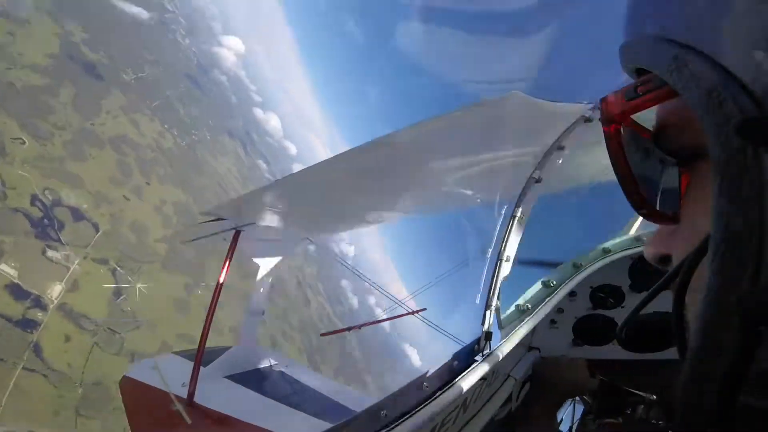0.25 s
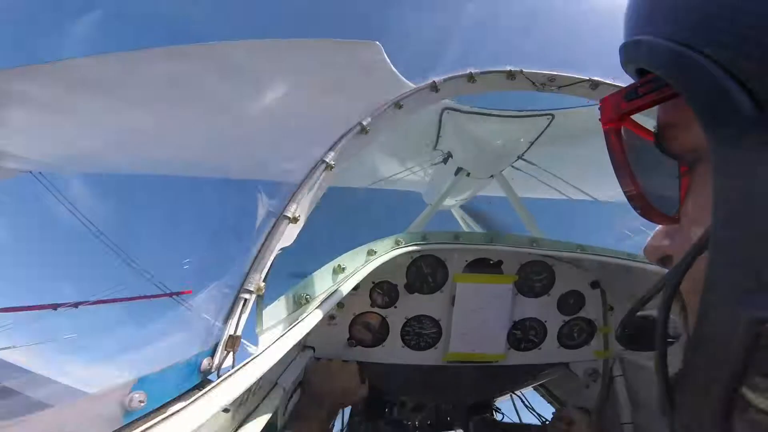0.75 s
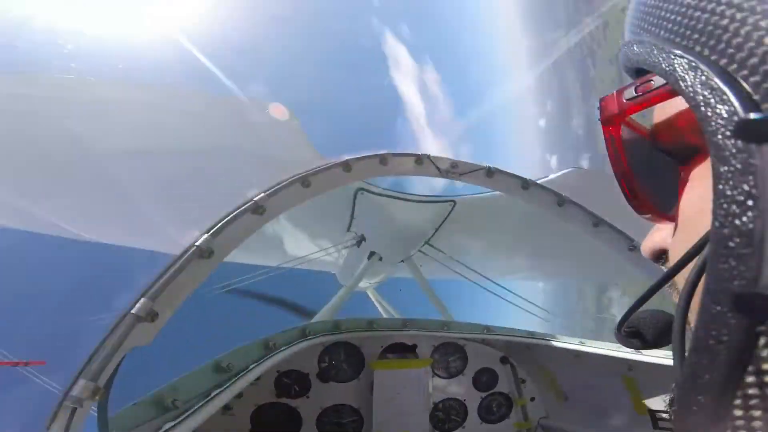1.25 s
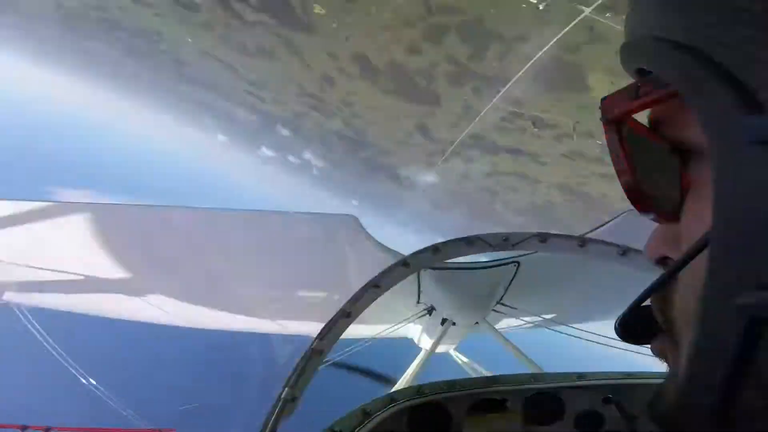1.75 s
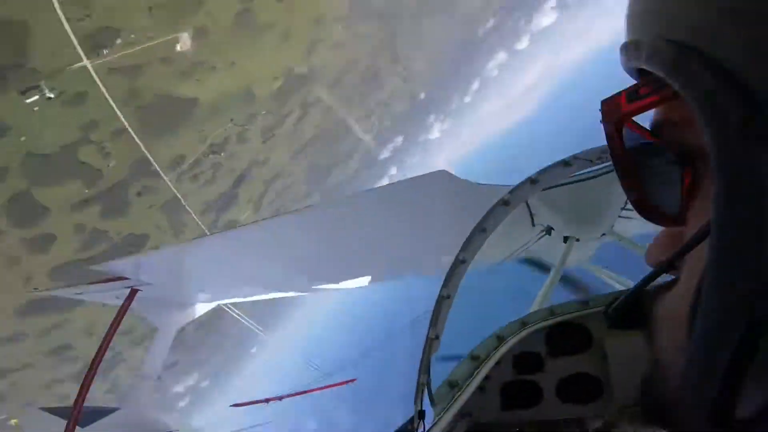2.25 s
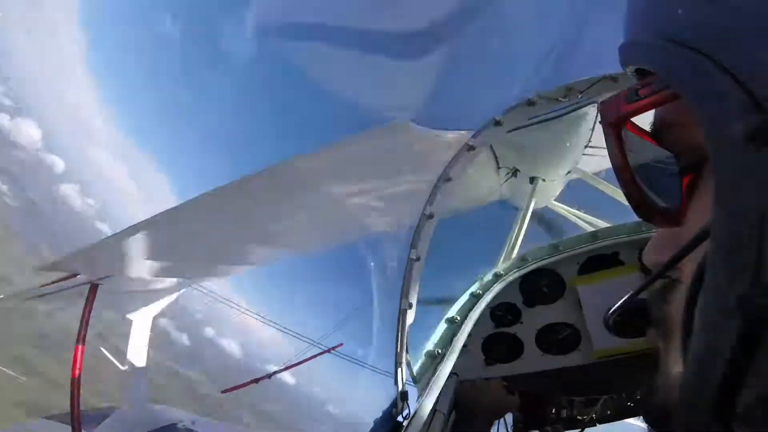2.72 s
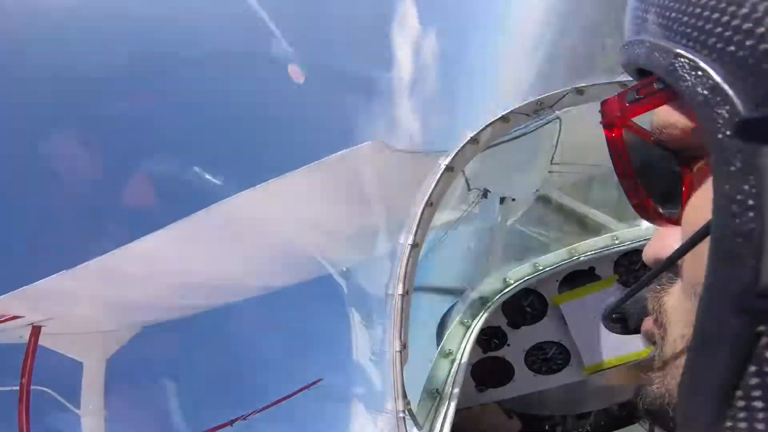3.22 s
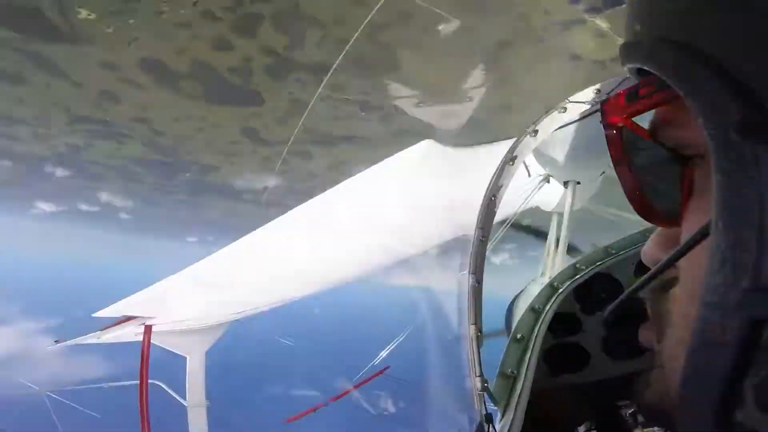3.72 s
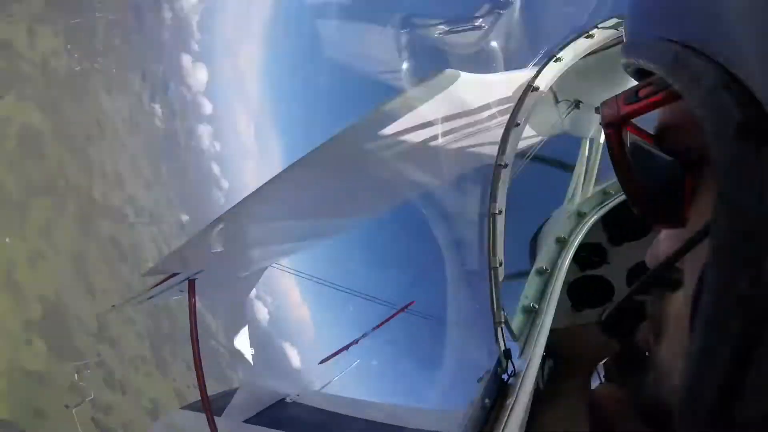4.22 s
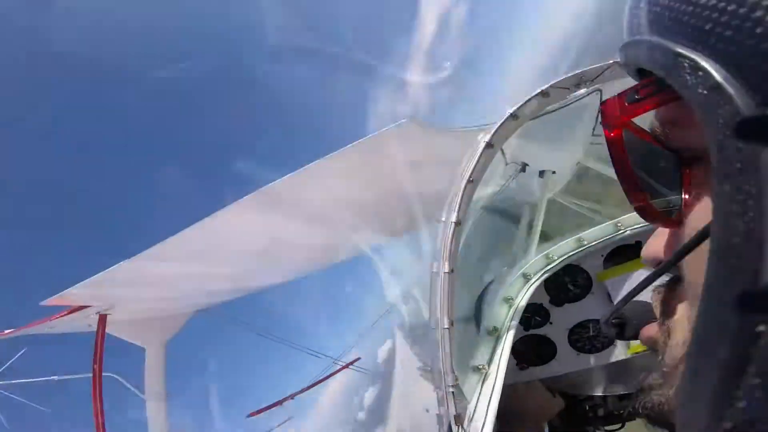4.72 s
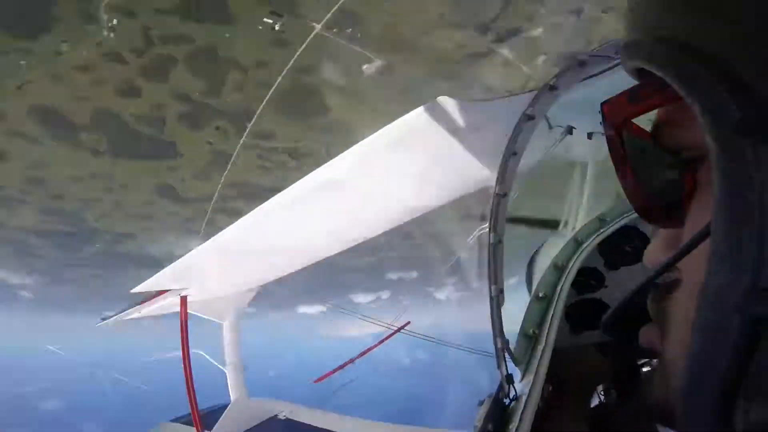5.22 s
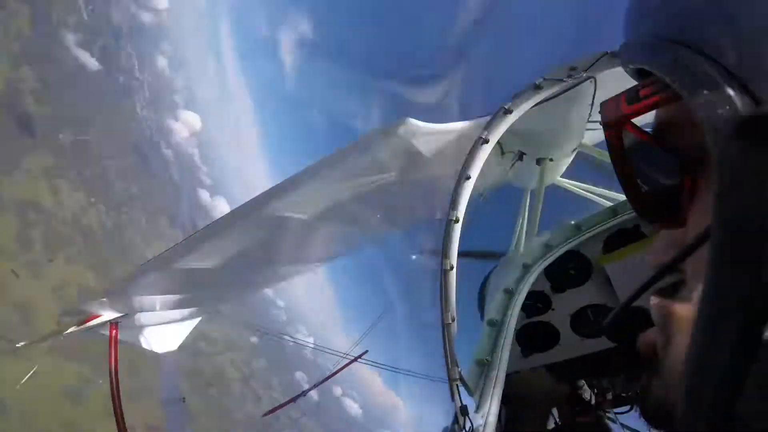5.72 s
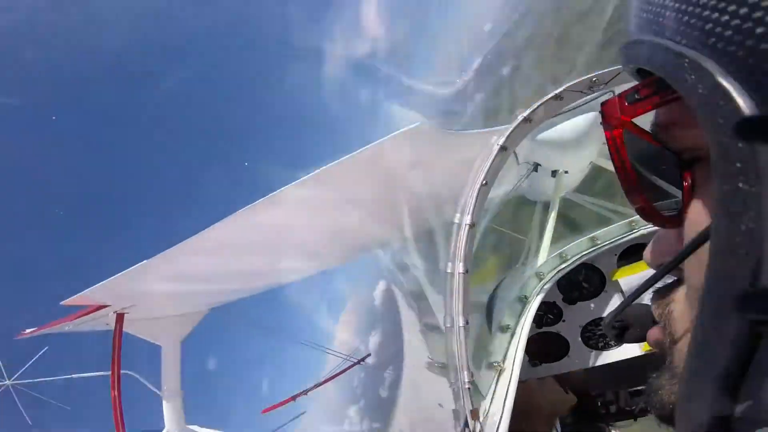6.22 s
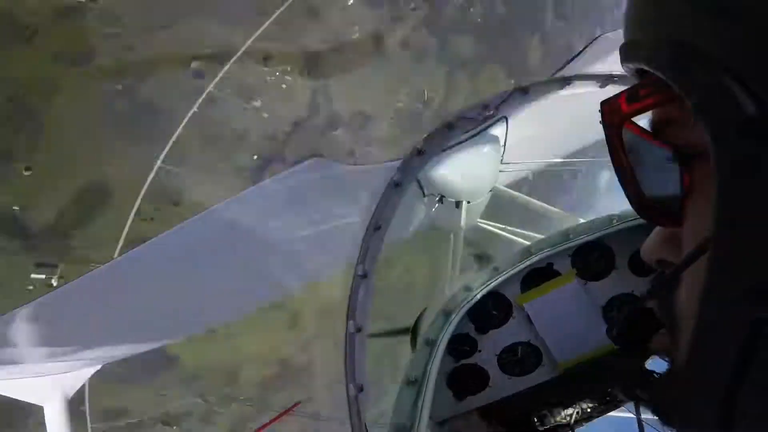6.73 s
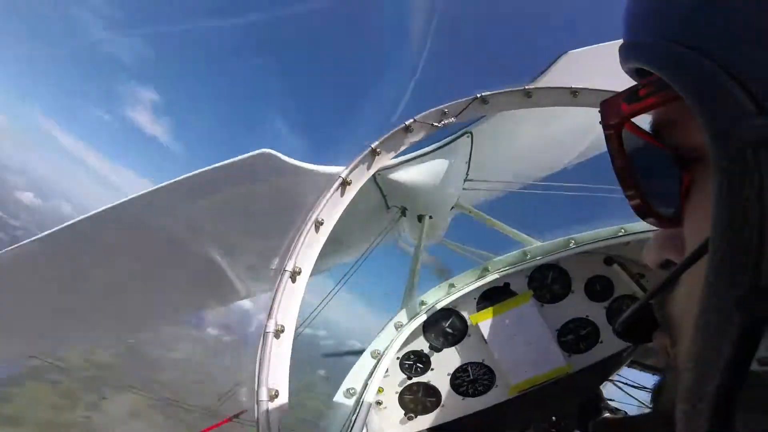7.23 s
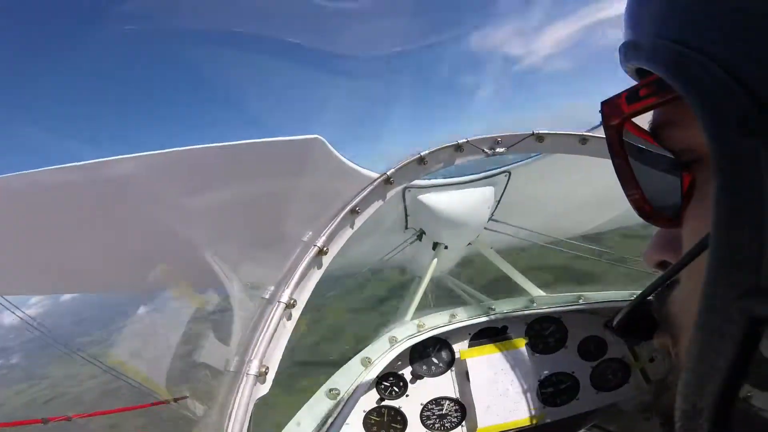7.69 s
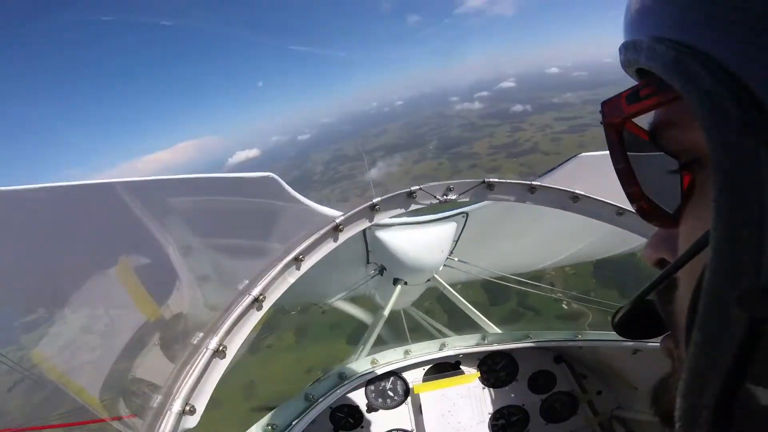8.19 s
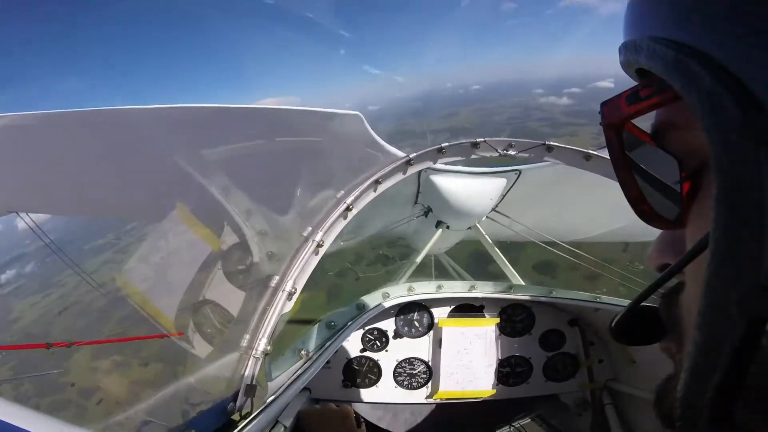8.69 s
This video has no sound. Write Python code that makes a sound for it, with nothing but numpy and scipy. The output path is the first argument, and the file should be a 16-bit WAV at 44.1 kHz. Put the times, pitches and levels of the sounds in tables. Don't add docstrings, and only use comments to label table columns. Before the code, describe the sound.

Hard, low buzzing from a propeller engine fills a cramped cockpit, with wind rushing over the canopy and throbbing with the blades. An abrupt short silence comes early. Afterwards the drone sags and recovers, its deep tones swelling and cancelling while panels ring faintly in the air noise. One soft tap sounds near the middle. A close onboard microphone gives a dense, bass-heavy sound with dull, broken highs.

```python
import sys
import numpy as np
from scipy import signal
from scipy.io import wavfile
from scipy.ndimage import uniform_filter1d

SR = 44100
rng = np.random.default_rng(int(sys.argv[2]) if len(sys.argv) > 2 else 0)


def inscribe(sig):
    pcm = np.round(np.clip(np.atleast_2d(sig).T, -1, 1) * 32767)
    wavfile.write(sys.argv[1], SR, pcm.astype(np.int16))


def volts_from_decibels(level):
    exponent = np.asarray(level, float) / 20
    return 10 ** exponent


N = 394694
DROP_S, RETURN_S, FADE_S = 1.4691, 1.8025, 0.026


def in_time(rows):
    seconds, *columns = np.transpose(rows)
    return [np.interp(np.arange(N) / SR, seconds, column) for column in columns]


def drift(rate_hz):
    pole = np.exp(-80 * np.pi * rate_hz / SR)
    noise = rng.standard_normal(N // 40 + 2002)
    slow = signal.lfilter([1], [1, -2 * pole, pole * pole], noise)[2000:]
    return np.interp(np.arange(N) / 40, np.arange(len(slow)), (slow - slow.mean()) / slow.std())


def swings(rows):
    t = np.arange(N) / SR
    return sum(db * np.exp(-((t - middle) / half) ** 2) for middle, half, db in rows)


def boost(x, hz, width, db):
    r = np.exp(-np.pi * width / SR)
    feedback = [1, -2 * r * np.cos(2 * np.pi * hz / SR), r * r]
    ring = signal.lfilter([(1 - r * r) / 2, 0, (r * r - 1) / 2], feedback, x)
    return x + (volts_from_decibels(db) - 1) * ring


# start_s, airspeed_db, sideslip_db
AIRFLOW = [(0, 3, 3.5), (.35, 2, 4.5), (.8, 4, -0.5), (1.9, 4.5, 1.5), (2.55, 3, 2.5), (2.8, 2.5, -1),
           (3.6, 3, 2.5), (4.2, 0.5, 3), (4.55, -3.5, -1.5), (4.95, -3.5, -2), (5.7, -3, 0.5),
           (5.98, -5, -1), (6.5, 0.5, 4), (6.95, -2.5, -7), (7.4, -3, -8), (7.8, -1.5, 0.5), (8.2, 0, -4),
           (8.6, -0.5, 0)]
SHARE_HZ = [70, 650, 1900, 3800, 4700, 9000, 12000]
SPEED_SHARE = [-.6, 0.17, 0.23, 0.64, 1, 0.54, .7]
SIDESLIP_SHARE = [-.4, 1, 0.2, -0.057, -0.0065, 0.19, -0.026]
# middle_s, half_length_s, centre_hz, change_db
GUSTS = [(0, 0.44, 2500, 4.5), (3.5, 0.41, 50, 11), (2.5, .2, 50, 5), (6, 0.27, 94, 4), (5, .25, 44, -9),
         (3.5, 0.69, 3100, -3.5), (8, 0.43, 40, -2.5), (8.5, .3, 3500, 1), (0.6, .25, 2700, 2.5),
         (5, .2, 840, 0), (7.85, .15, 1100, -1.5), (6.4, 0.28, 6500, -4), (8.5, 0.81, 3200, 2),
         (0.7, .2, 2400, -0.5)]
# pitch_hz, level_db per Hz
WIND_COLOUR = [(22, -55.5), (42, -50.5), (110, -50), (220, -50), (330, -55), (500, -58), (1000, -64.5),
               (2200, -66), (3800, -71.5), (5300, -79), (7500, -83), (9500, -99.5), (11500, -99),
               (14000, -111)]


def swell_in_band(hz, speed_db, sideslip_db):
    gust_octaves = 0.74
    swell_db = np.interp(np.log(hz), np.log(SHARE_HZ), SPEED_SHARE) * speed_db
    swell_db = swell_db + np.interp(np.log(hz), np.log(SHARE_HZ), SIDESLIP_SHARE) * sideslip_db
    for middle, half, gust_hz, db in GUSTS:
        octaves = np.log2(hz / gust_hz)
        if abs(octaves) < 2 * gust_octaves:
            swell_db = swell_db + swings([(middle, half, db)]) * np.exp(-(octaves / gust_octaves) ** 2)
    return swell_db


def wind(turn):
    speed_db, sideslip_db = in_time(AIRFLOW)
    table_hz, table_db = np.transpose(WIND_COLOUR)
    white = rng.standard_normal((2, N)) * np.sqrt(SR / 2)
    edges = 16.6 * 2 ** (np.arange(31) / 3)
    blade_db = 1.05 * np.cos(turn + 1.0 * drift(1.3))
    cycle_db = 0.8 * np.cos(turn / 4 + 2.4 * drift(1.27))
    shared_db = blade_db + cycle_db + 0.37 * drift(8.7) + 0.5 * drift(54)
    out = np.zeros(N)
    for k, (low, high) in enumerate(zip(edges, edges[1:])):
        hz = np.sqrt(low * high)
        level_db = np.interp(np.log(hz), np.log(table_hz), table_db) + shared_db + 1.0 * drift(1.5)
        level_db += swell_in_band(hz, speed_db, sideslip_db)
        band = signal.butter(2, [low, high], "band", fs=SR, output="sos")
        out += volts_from_decibels(level_db) * signal.sosfilt(band, white[k % 2])
    return out


# pitch_hz, width_hz, boost_db
PANELS = [(702, 100, 3.5), (930, 80, 4.5), (1195, 36, 4.5), (1453, 25, 4.5), (2165, 92, 2), (2410, 69, 0.5),
          (3720, 130, 2)]
# middle_s, half_length_s, pitch_hz, width_hz, boost_db
SINGING = [
    (.15, 0.21, 930, 60, -1),
    (2.3, 0.2, 1440, 60, 4),
    (4.1, 0.42, 1286, 60, 6),
    (5.5, 1, 1237, 60, 4.5),
    (6.0, .6, 2310, 150, 6),
    (7.15, 0.36, 1540, 60, 5),
    (8.25, .2, 2560, 90, 7),
]
# pitch_hz, width_hz, boost_db
HOUSING = [(6440, 350, 7), (11300, 830, 6.5)]


def slipstream(turn):
    out = wind(turn)
    for hz, width, db in PANELS:
        out = boost(out, hz, width, db * np.clip(1 + 0.12 * drift(0.63), 0, 3))
    for middle, half, hz, width, db in SINGING:
        out = boost(out, hz, width, db * np.exp(-((np.arange(N) / SR - middle) / half) ** 4))
    for hz, width, db in HOUSING:
        out = boost(out, hz, width, db)
    return out


def knock():
    start_s, level_db, pitch_hz, decay_s = 4.086, -19, 1200, 0.012
    age = np.arange(N) / SR - start_s
    burst = rng.standard_normal(N) * (age > 0) * np.exp(-np.abs(age) / decay_s)
    band = signal.butter(2, [pitch_hz / 2.4, pitch_hz * 0.98], "band", fs=SR, output="sos")
    return volts_from_decibels(level_db + 5) * signal.sosfilt(band, burst + 1e-18)


# pitch_hz, width_hz, boost_db
AIR_MODES = [(128.9, 6.5, 15.5), (259.9, 38.6, 7), (329.4, 14, 10), (411.3, 12, 13.5), (737, 30, 11)]


def cockpit_db(hz):
    return sum(db / (1 + (2 * (hz - mode_hz) / width) ** 2) for mode_hz, width, db in AIR_MODES)


# start_s, firing_hz
ENGINE_SPEED = [(0, 89.3), (1.44, 85.3), (2.06, 83.5), (2.66, 81.6), (3.66, 78.6), (4.3, 75.1), (4.5, 75.1),
                (4.95, 77.7), (5.18, 77.6), (5.58, 75), (5.88, 74.3), (6.48, 77.9), (6.72, 77.8),
                (7.1, 75.2), (7.48, 74.2), (7.92, 77.2), (8.46, 78.6), (8.95, 80.9)]


def firing_rate():
    return in_time(ENGINE_SPEED)[0]


# start_s, first_db, second_db
TONES = [(0, -18, -27), (.2, -16, -22), (1.0, -14, -21.5), (1.4, -14.5, -19.5), (1.9, -17.5, -19),
         (2.6, -15.5, -16.5), (2.95, -20, -17), (3.55, -20.5, -15.5), (4.0, -19.5, -15.5),
         (4.35, -13, -15.5), (4.7, -15.5, -21), (5.0, -18.5, -15.5), (5.5, -20, -14.5), (5.95, -13, -20),
         (6.3, -17, -17.5), (6.9, -13, -13.5), (7.55, -16, -17.5), (8.95, -20, -18)]
# start_s, skew_rad
SKEW = [(0, -.9), (1.1, -1.7), (1.9, -1.3), (2.6, .6), (3.3, .9), (3.7, 2.3), (4.9, .3), (5.3, 1.6),
        (6.2, -2.4), (6.5, .2), (7.5, -1.7), (8.0, 1.9), (8.9, 3.3)]
# middle_s, half_length_s, change_db
FIRST_NULLS = [(3.6, .04, -1), (3.8, 0.054, -13.5), (4.9, 0.11, -11), (5.35, 0.14, -5), (6.57, 0.15, -17),
               (7.9, 0.22, -25), (8.25, .15, -7)]
# middle_s, half_length_s, change_db
SECOND_NULLS = [(2.48, 0.11, -5), (3.25, 0.12, -5), (4.6, 0.12, -3), (6.22, 0.13, -7.5), (7.02, 0.11, -7),
                (7.72, 0.081, -14), (8.2, 0.039, -0.5)]
# middle_s, half_length_s, change_db
THIRD_FLARES = [(1.1, 0.66, 3), (2.08, 0.11, 7.6), (2.75, 0.21, 5.8), (3.35, 0.13, 8.4), (4.2, 0.038, 7.5),
                (4.4, .05, 7.7), (4.92, .08, 5.8), (5.15, 0.11, 4.8), (5.8, .05, 7.1), (6.5, 0.11, 5),
                (6.85, 0.28, 8), (7.9, 0.039, 8.4), (8.1, 0.042, 9), (8.3, .05, 5.8), (8.8, .2, 5.4)]


def main_tones(turn, rate, lope_db):
    skew = in_time(SKEW)[0]
    first_db, second_db = in_time(TONES)
    tones_db = [first_db + swings(FIRST_NULLS),
                second_db + swings(SECOND_NULLS),
                -35.5 + swings(THIRD_FLARES) + cockpit_db(3 * rate)]
    out = np.zeros(N)
    for k, db in enumerate(tones_db, start=1):
        lag = -skew / 2 if k == 1 else 0.14 * (k - 1) * drift(11)
        out += np.sqrt(2) * volts_from_decibels(db + 0.61 * k * drift(12) + lope_db) * np.cos(k * turn + lag)
    return out


FAINT_MULTIPLES = (.5, 2.5, 4.5, 5.5, 6.5, 7, 10)
FAINT_DB = [-43.5, -36.5, -43, -43.5, -47, -47, -49]
HIGHER_MULTIPLES = (1.5, 3.5, 4, 5, 6, 7.5, 8, 8.5, 9, 9.5)
HIGHER_DB = [-45.5, -39.5, -43, -42, -44.5, -47.5, -48, -53, -50.5, -54]
PASSING_MULTIPLES = (6, 3.5, 3.5, 5, 6, 6, 9, 4, 1.5, 6, 4, 4, 5, 1.5, 4, 1.5, 9, 9.5, 8, 5, 8.5, 4, 4, 5)
# middle_s, half_length_s, change_db
PASSING = [(0.15, .25, 10), (.25, .3, 7), (1.1, .4, -17), (1.05, .3, 7), (1.84, 0.17, 10), (2.79, 0.16, 10),
           (3.22, .2, 7), (4.05, .15, 8), (3.75, .15, 8), (3.68, 0.12, 10), (7.9, .15, 6), (6, .3, 1),
           (4.95, .2, 7), (7.3, .25, 10), (8.6, .25, 8.5), (8.9, .15, 12), (6, .2, -10), (9.4, 0.26, 9),
           (.1, .15, 9), (8.7, 0.25, -8), (1.05, .35, 5.5), (2.2, 0.36, 5), (1.2, .3, -7),
           (2.48, 0.32, 3.5)]


def fine_lines(turn, rate):
    wander_db, load_db_per_hz = 2.0, 0.08
    load_db = load_db_per_hz * (rate - rate.mean())
    lines = []
    for multiple, db in zip(HIGHER_MULTIPLES, HIGHER_DB):
        passing = [row for which, row in zip(PASSING_MULTIPLES, PASSING) if which == multiple]
        level_db = db + load_db + cockpit_db(multiple * rate) + wander_db * drift(1.57)
        lines.append((multiple, level_db + swings(passing)))
    for multiple, db in zip(FAINT_MULTIPLES, FAINT_DB):
        lines.append((multiple, db + load_db + wander_db * drift(0.83)))
    out = np.zeros(N)
    for multiple, db in lines:
        lag = 0.5 * drift(0.8) + 0.02 * multiple * drift(10)
        out += np.sqrt(2) * volts_from_decibels(db + 1.0 * drift(29)) * np.cos(multiple * turn + lag)
    return out


def engine(turn):
    rate = firing_rate()
    lope_db = 0.91 * np.cos(turn / 4 + 1.5 * drift(1.0))
    return main_tones(turn, rate, lope_db) + fine_lines(turn, rate)


def scene():
    turn = 2 * np.pi * np.cumsum(firing_rate() * (1 + 0.001 * drift(10))) / SR
    turn += 1.55 - turn[round(DROP_S * SR)]
    return (slipstream(turn) + knock() + engine(turn))[None]


# pitch_hz, level_db against the usual level there
TREBLE_BAR = [(5500, -22), (7000, -7), (8300, -1), (11000, 0), (12000, 2), (13300, 8), (14300, 20)]


def pitted_treble(x):
    window = np.sqrt(signal.get_window("hann", 2048))
    frames = dict(fs=SR, window=window, nperseg=2048, noverlap=1024)
    hz, _, z = signal.stft(x, **frames)
    usual = uniform_filter1d(abs(z) ** 2, size=30, axis=2)
    usual = np.sqrt(uniform_filter1d(usual, size=40, axis=1))
    patches = rng.standard_normal((len(hz) // 12 + 1, z.shape[-1]))
    patches = uniform_filter1d(patches, size=3, axis=1)
    patches = np.repeat(patches, 12, axis=0)[:len(hz)]
    bar_db = np.interp(hz, *np.transpose(TREBLE_BAR), left=-99)[:, None] + 6 * patches
    return signal.istft(z * (abs(z) > usual * volts_from_decibels(bar_db)), **frames)[1][..., :N]


def blinks():
    every_s, length_s, share, level_db = 0.1672, 0.03, 0.8, -76
    starts = np.arange(RETURN_S + 0.1, N / SR - 0.1, every_s)
    draws = rng.random((len(starts), 3))
    gate = np.zeros(N)
    for start, (kept, late, long) in zip(starts, draws):
        for edge in (0, length_s * (0.5 + long)):
            i = int((start + length_s * late + edge) * SR)
            gate[i:i + 200] = np.hanning(200) * (kept < share)
    band = signal.butter(4, [12800, 15700], "band", fs=SR, output="sos")
    return volts_from_decibels(level_db) * signal.sosfilt(band, gate * rng.standard_normal(N) + 1e-18)


def top_cut(x):
    return signal.sosfilt(signal.butter(12, 15700, fs=SR, output="sos"), x)


def record(dry):
    t = np.arange(N) / SR
    rounded = 0.88 * np.tanh(dry / 0.91)
    heard = signal.sosfilt(signal.butter(2, 14, "high", fs=SR, output="sos"), rounded)
    back = np.sin(np.pi / 2 * np.clip((t - RETURN_S) / FADE_S, 0, 1)) ** 1.2
    gate = np.where(t < DROP_S, 1, back)
    return top_cut((pitted_treble(heard) + blinks()) * gate)


dry = scene()
out = record(dry)
inscribe(out)
```